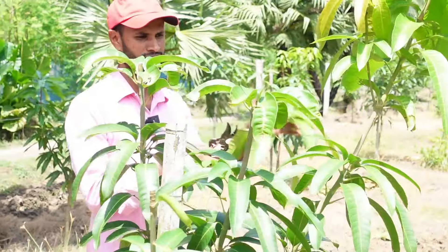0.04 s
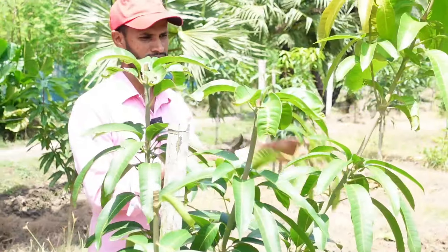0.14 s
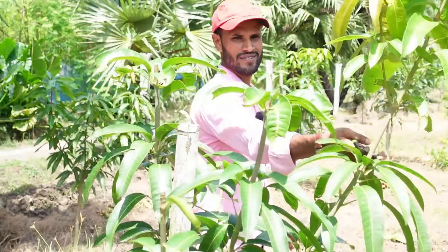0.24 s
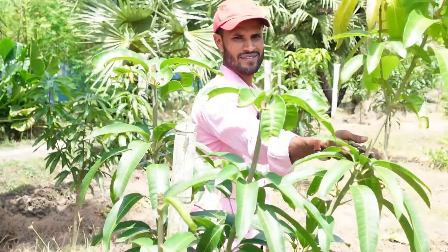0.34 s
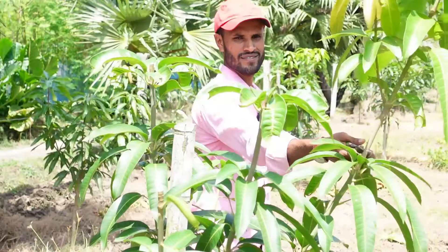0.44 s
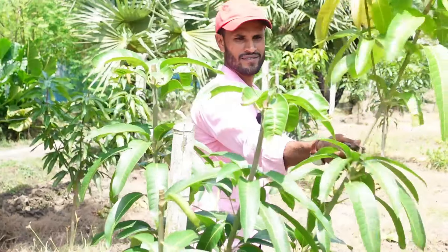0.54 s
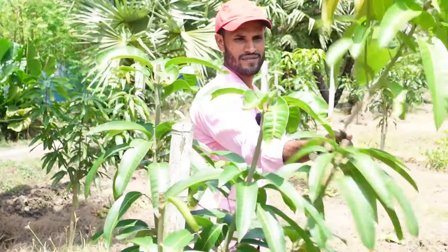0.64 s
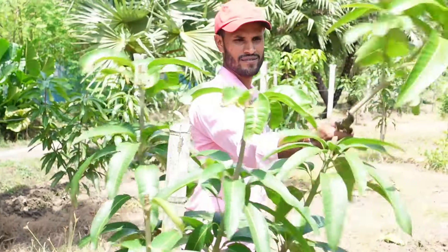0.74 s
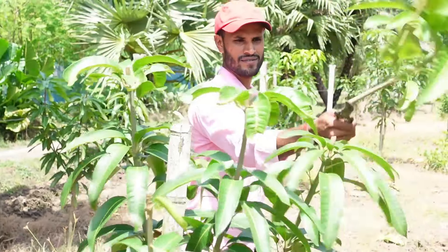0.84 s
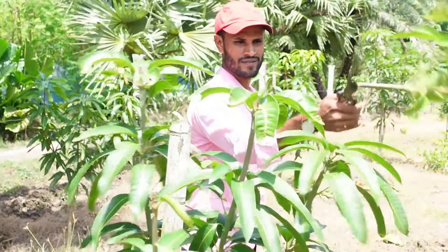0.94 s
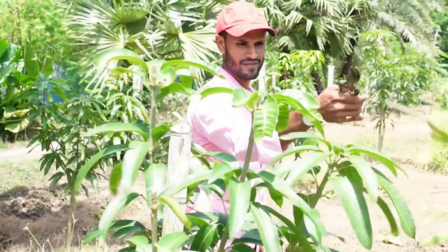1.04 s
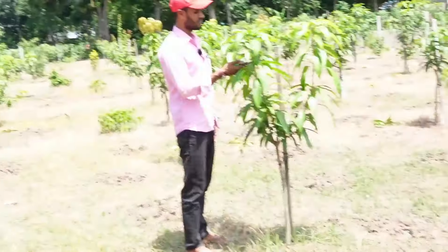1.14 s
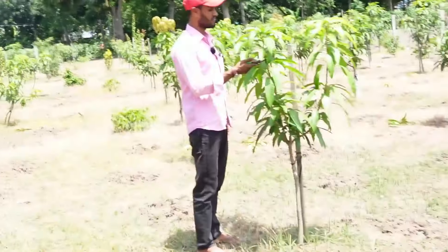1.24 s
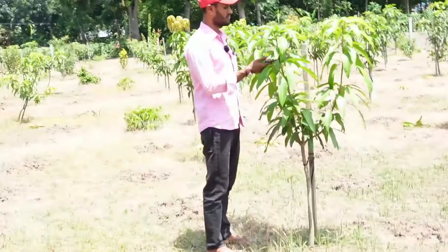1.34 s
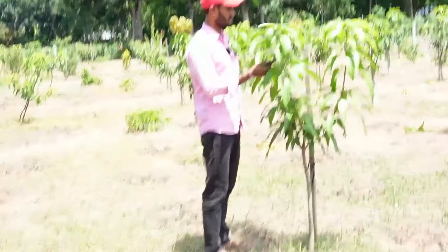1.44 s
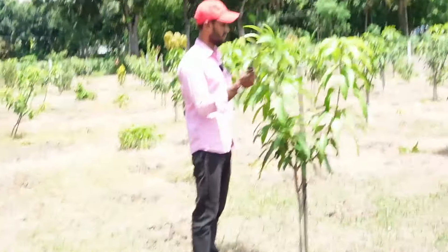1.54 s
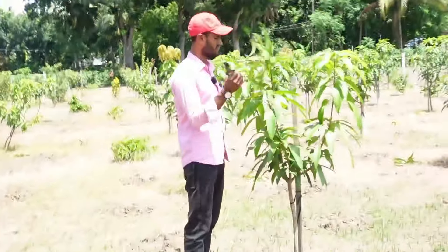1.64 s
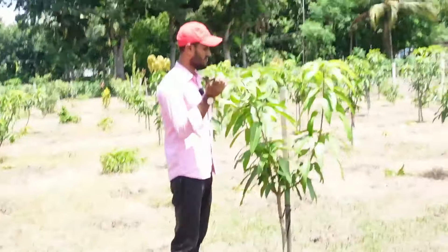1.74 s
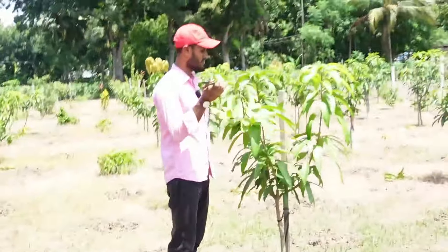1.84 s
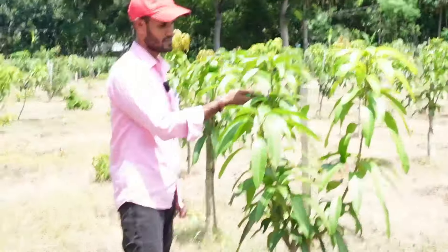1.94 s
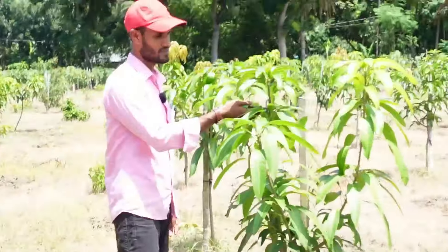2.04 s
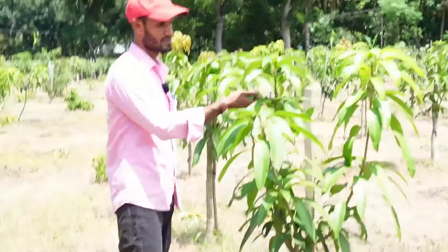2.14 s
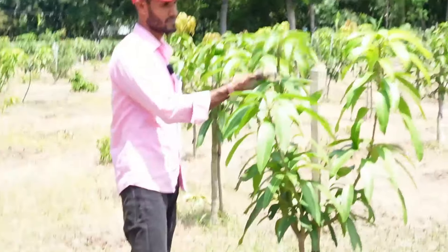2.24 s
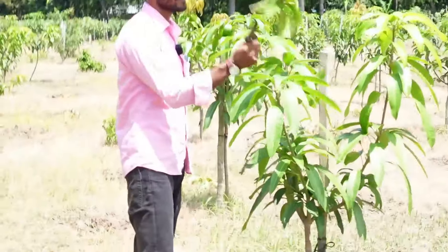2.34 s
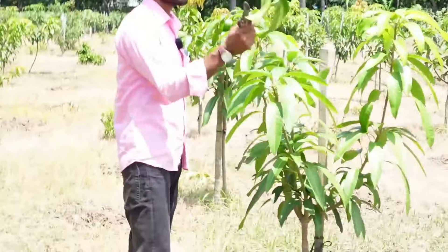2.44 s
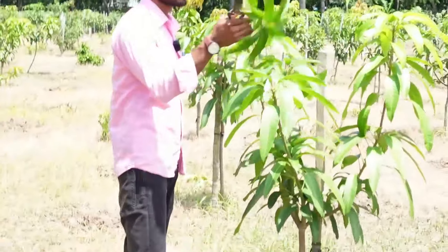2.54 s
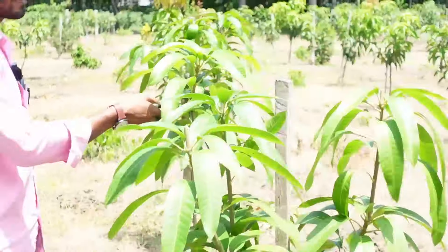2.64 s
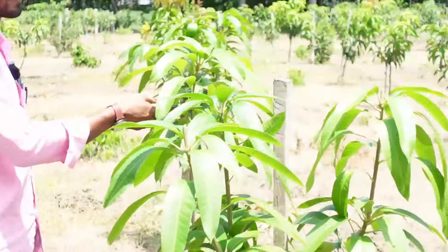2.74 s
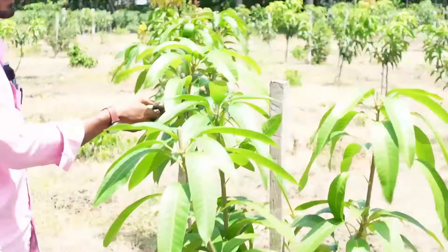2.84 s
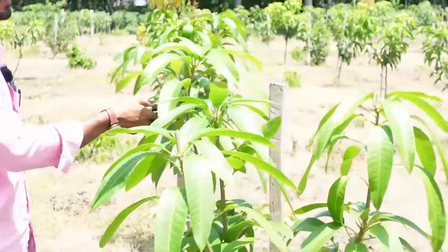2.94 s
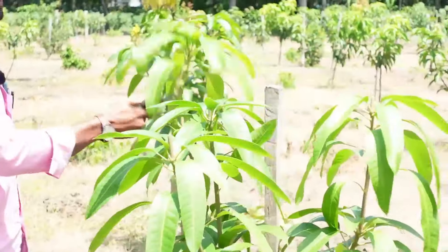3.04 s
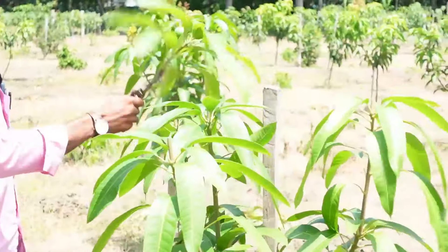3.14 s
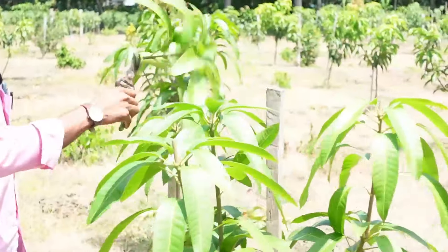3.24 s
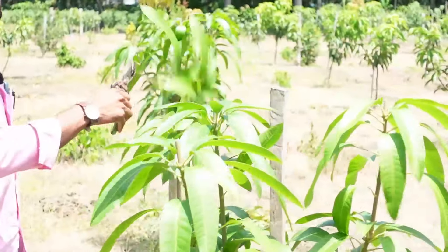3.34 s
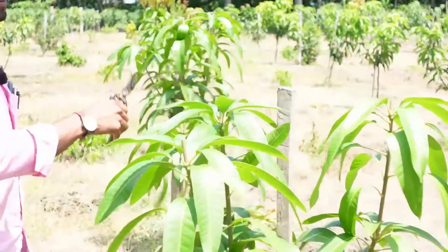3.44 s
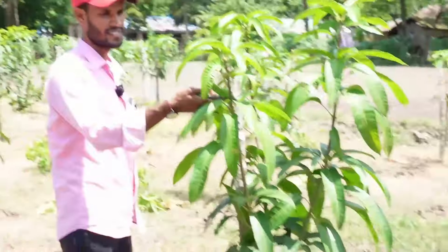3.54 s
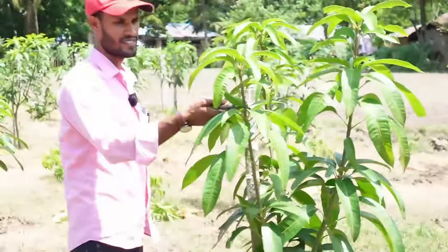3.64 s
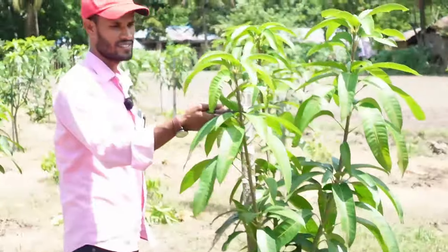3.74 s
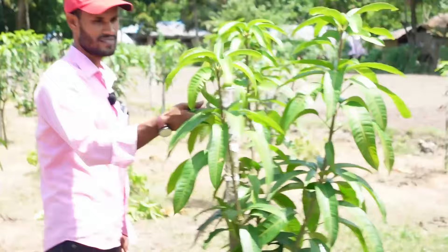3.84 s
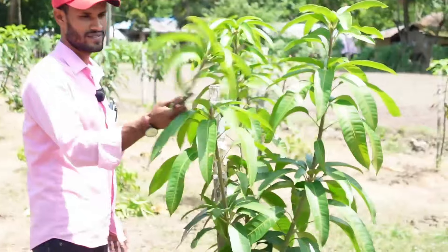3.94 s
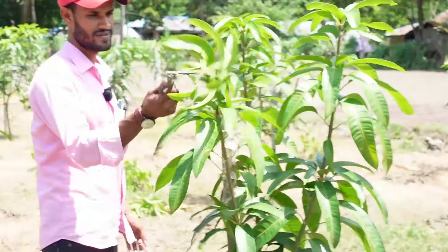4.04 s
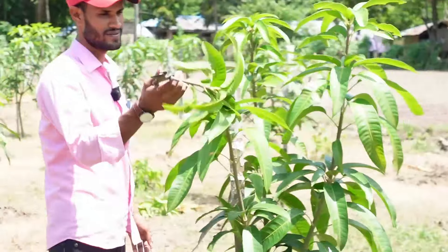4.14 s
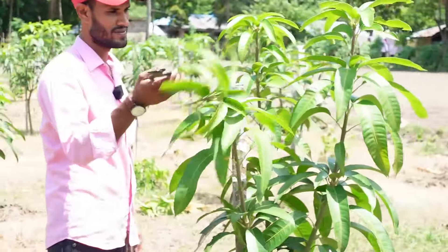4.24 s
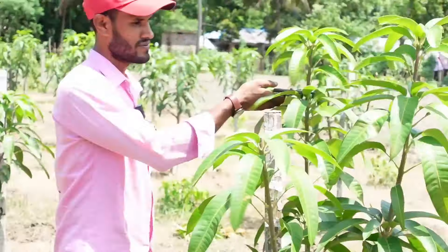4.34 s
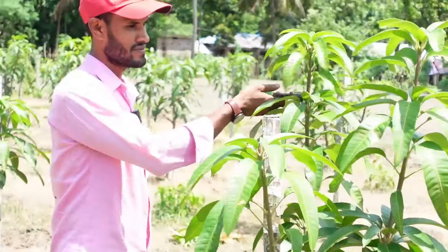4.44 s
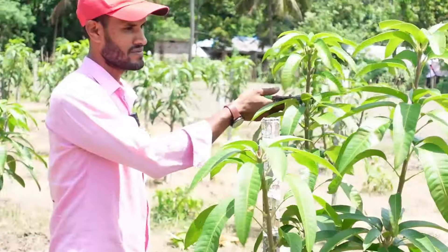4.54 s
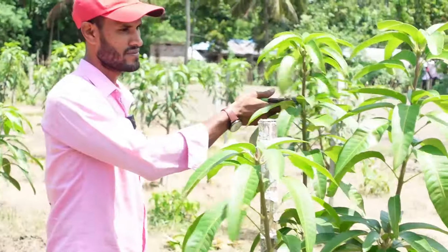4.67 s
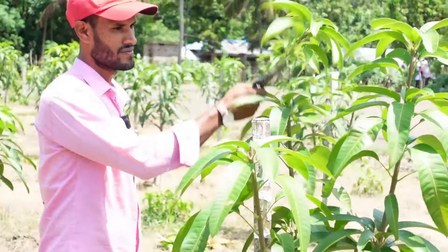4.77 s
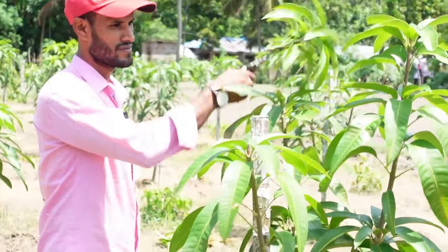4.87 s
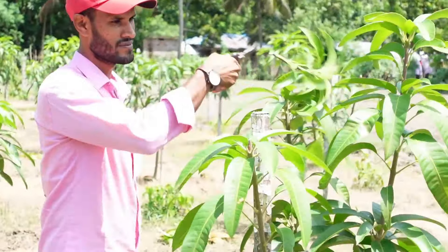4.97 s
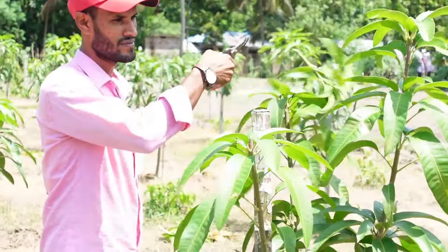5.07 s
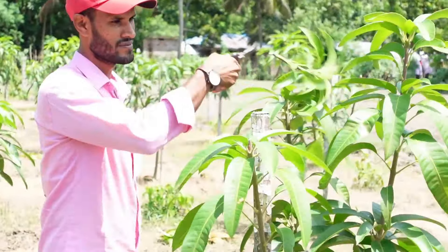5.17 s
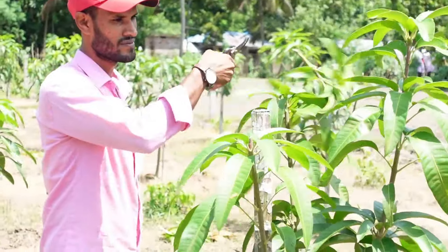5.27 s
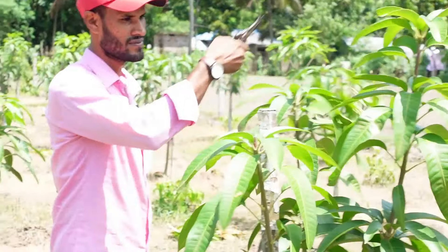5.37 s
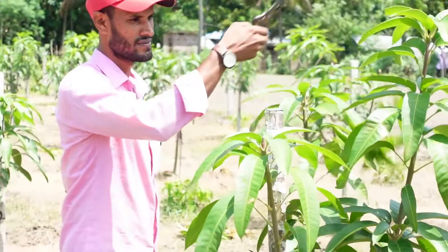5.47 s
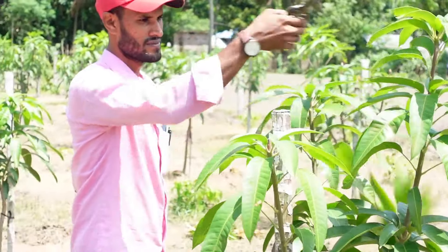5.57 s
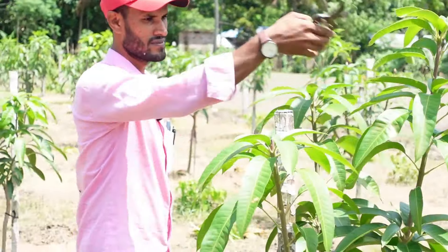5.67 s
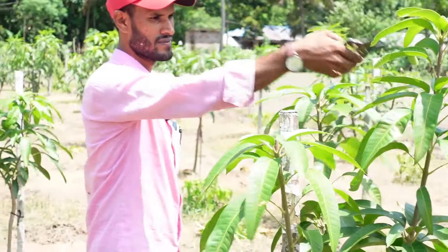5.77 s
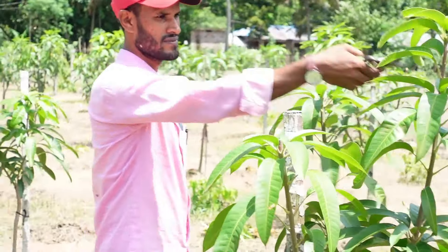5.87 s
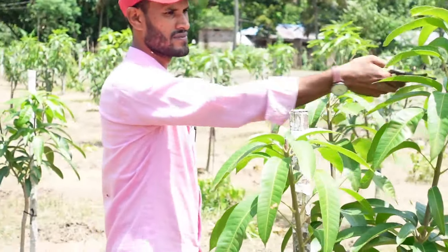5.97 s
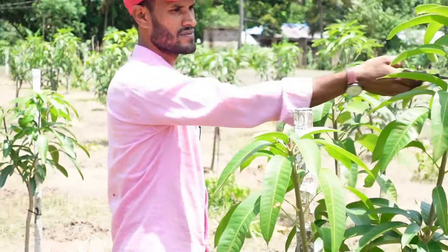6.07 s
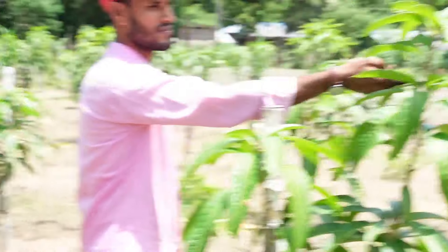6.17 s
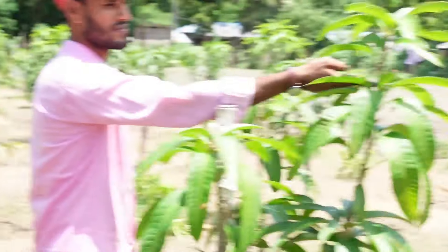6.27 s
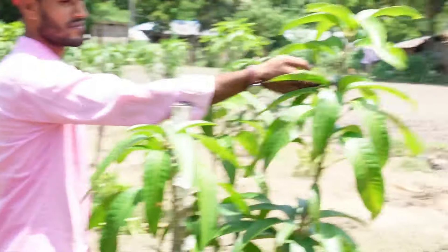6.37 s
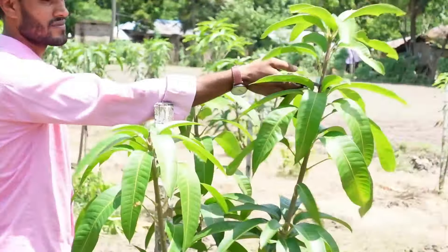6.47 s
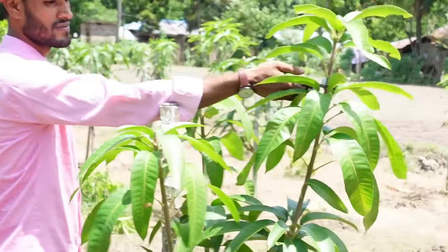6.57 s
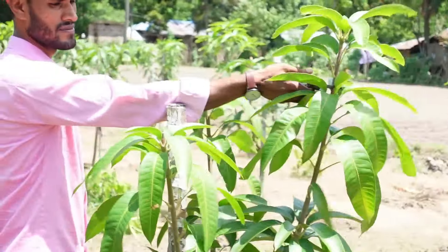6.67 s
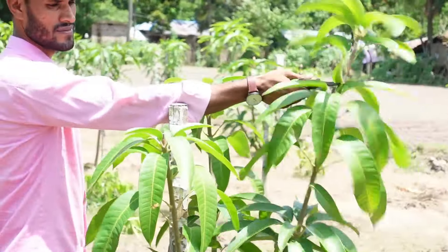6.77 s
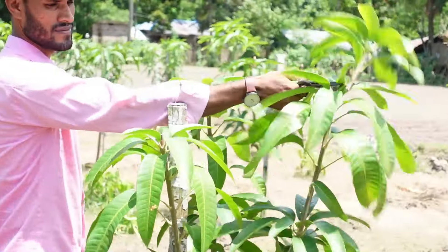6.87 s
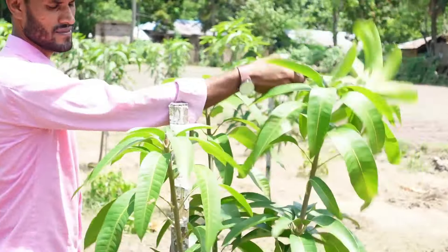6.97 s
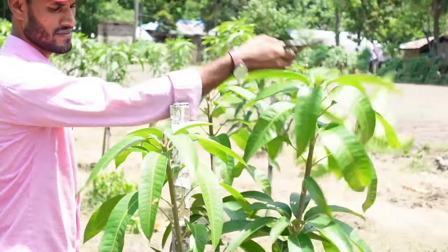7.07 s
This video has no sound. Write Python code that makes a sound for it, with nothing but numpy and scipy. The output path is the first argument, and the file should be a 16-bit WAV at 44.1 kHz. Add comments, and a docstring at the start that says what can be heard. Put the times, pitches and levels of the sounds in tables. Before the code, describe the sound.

Hand pruning shears snap shut seven times with sharp metallic snips, stiff leaves rustling between cuts in a quiet, breezy orchard.

```python
"""In an orchard, close to a lapel microphone, hand secateurs snip green shoots.
Each snip: fibres crackle as the blade bites, then damped modes ring for the slam and for the rebound.
One stem tears in a dense crunch. Leaves rustle in filtered noise and short rings, and they tick;
the spring squeaks in rough harmonics. Breeze, insect hiss and faint far tones lie under it."""
import sys
import numpy as np
from scipy import signal
from scipy.fft import rfft, irfft, next_fast_len
from scipy.io import wavfile
from scipy.ndimage import uniform_filter1d

SR = 44100
rng = np.random.default_rng(int(sys.argv[2]) if len(sys.argv) > 2 else 0)


def transcribe(signal):
    """Save signal, clipped to [-1, 1], as a 16-bit WAV file at the path in sys.argv[1]."""
    frames = np.atleast_2d(signal).T
    limited = np.clip(frames, -1, 1)
    pcm = np.round(limited * 32767).astype(np.int16)
    wavfile.write(sys.argv[1], SR, pcm)


N = 313418  # length in samples


def amp(db):
    """Turns dB into a linear gain."""
    return 10 ** (np.asarray(db, float) / 20)


def evened(x):
    """Brings a signal to rms 1."""
    return x / np.sqrt(np.mean(x ** 2) + 1e-20)


def noise(length):
    """White noise."""
    return rng.standard_normal(length)


def read(points, hz):
    """Reads a curve between its points, along log frequency."""
    f, value = np.transpose(points)
    return np.interp(np.log(hz + 1), np.log(f + 1), value)


def add(mix, s, sound):
    """Lays a sound into the mix at s seconds."""
    part = mix[max(round(s * SR), 0):][:len(sound)]
    part += sound[:len(part)]


def colour(x, points):
    """Filters by a spectrum, with rms 1."""
    size = next_fast_len(len(x))
    gain = amp(read(points, np.fft.rfftfreq(size, 1 / SR)))
    return evened(irfft(rfft(x, size) * gain, size)[:len(x)])


def wander(length, seconds):
    """Smooth chance of rms 1: noise averaged twice over the given time."""
    width = max(int(seconds * SR), 1)
    return evened(uniform_filter1d(uniform_filter1d(noise(length), width), width))


def crackle(length, per_s, spread_db):
    """Clicks of very unequal size, scattered at random."""
    draw = rng.random((length, 2))
    clicks = draw[:, 0] < per_s / SR
    size = amp(-spread_db * np.log(draw[:, 1] + 0.0024))
    return clicks * size * noise(length)


def ring(t, hz, t60):
    """A damped mode struck at t = 0; the contact lasts a fraction of a millisecond."""
    u = np.maximum(t, 0)
    contact = 1 - np.exp(-u / 0.00043)
    return np.sin(2 * np.pi * hz * u) * amp(-60 * u / t60) * contact


# Spectrum of the far hiss: f/Hz, relative level/dB per Hz
AIR_SPECTRUM = [(71, -25), (120, -0.5), (300, -2), (695, -5), (1500, -14), (2500, -16), (4740, -23),
                (5900, -28.5), (8300, -27.5), (9600, -19.5), (10300, -25.5), (11000, -34), (15800, -46)]
AIR_DB = -62.5


def far_hiss():
    """Insects and air far off: coloured noise, almost steady."""
    return amp(AIR_DB + 0.39 * wander(N, 0.04)) * colour(noise(N), AIR_SPECTRUM)


# Strength of the breeze, before its lumps: t/s, level/dB
BREEZE_LEVEL = [(0.0, -56.5), (0.14, -63), (3.15, -62.5), (4.3, -57.5), (5.66, -65.5), (6.35, -61.5),
                (6.8, -48), (6.95, -55.5), (7.11, -47)]
# Spectrum of the breeze: f/Hz, relative level/dB per Hz
GUST_SPECTRUM = [(15, -9), (30, 6), (60, 4.5), (100, 1.5), (160, -7.5), (300, -46.5)]


def breeze(t):
    """Wind buffets the microphone: deep noise with a lumpy level."""
    level_db = np.interp(t, *np.transpose(BREEZE_LEVEL)) + 1.5 * wander(N, 0.016)
    return amp(level_db) * colour(noise(N), GUST_SPECTRUM)


# Faint far tones, before wavering: t/s, length/s, start f/Hz, end f/Hz, level/dB
FAR_TONES = [(1.152, .3, 782, 777, -67), (1.553, 0.43, 606, 573, -64), (2.746, .12, 587, 590, -62),
             (3.102, 0.35, 746, 714, -58), (3.123, .78, 638.5, 568, -63), (4.905, 2.87, 352, 346.7, -70)]


def far_tone(s, length, from_hz, to_hz, db):
    """A gliding sine, unsteady in pitch and level."""
    size = round(length * SR)
    hz = np.linspace(from_hz, to_hz, size) * (1 + .03 * wander(size, 0.0042))
    turn = 2 * np.pi * np.cumsum(hz) / SR
    level = amp(db + 3 * wander(size, .008))
    return s, level * np.sin(turn) * signal.windows.tukey(size, .3)


def grains(low_hz, high_hz, count=14):
    """Leaf edges catch and let go: short rings of many pitches, each coming in its own clumps."""
    out = np.zeros(N)
    for hz in np.geomspace(low_hz, high_hz, count):
        t = np.arange(0, 12 / hz, 1 / SR)
        clumps = amp(3.5 * np.repeat(wander(N // 64 + 1, .0003), 64)[:N])  # one value per 64 samples
        catches = clumps * crackle(N, 500, 2.5)
        out += np.sqrt(hz) * signal.oaconvolve(catches, ring(t, hz, 11 / hz))[:N]
    return evened(out)


def patchy(x, patchy_db):
    """Separate leaves brush one after another, each in its own range of pitch."""
    z = signal.stft(x, nperseg=256)[2]
    patches = uniform_filter1d(noise(z.shape), size=9, axis=0)  # neighbouring pitches
    patches = uniform_filter1d(patches, size=6, axis=1)  # neighbouring moments
    return signal.istft(z * amp(patchy_db * evened(patches)), nperseg=256)[1][:N]


# Leaves brush hand and tool; levels before the flicker:
# t/s, length/s, dull level at the start/dB, dull level at the end/dB, bright level against dull/dB
BRUSHES = [(0.029, 0.074, -54, -57, -3.5), (.61, .04, -50.5, -50.5, -9.5), (0.694, 0.27, -54, -70, -6),
           (1.024, 0.13, -61, -70, -13), (1.44, 0.028, -57, -54.5, -13), (1.526, .08, -44, -57, -9),
           (1.686, 0.05, -53, -53, -6), (1.789, 0.12, -58.5, -49.5, -7.5), (2.23, .05, -57.5, -57, -19.5),
           (2.337, 0.07, -49.5, -58, -7.5), (2.424, 0.25, -58.5, -54.5, -3.5),
           (3.015, 0.044, -53.5, -52.5, -12.5), (3.1, .22, -65, -55.5, -11), (3.38, 0.15, -58.5, -53, -12),
           (3.875, 0.055, -59.5, -49.5, -10.5), (3.984, .06, -53.5, -56, -6.5),
           (4.104, 0.13, -50, -52, -6.5), (4.299, 0.044, -58.5, -56.5, -6.5),
           (4.811, 0.11, -56, -54.5, -7.5), (4.964, 0.48, -49.5, -52.5, -3), (5.576, 0.038, -63, -62.5, -3),
           (5.845, 0.032, -65.5, -60, -5.5), (6.03, 0.083, -53.5, -64, -6.5),
           (6.36, 0.064, -67, -63.5, -3.5), (6.815, 0.16, -47.5, -55, -9.5), (7.025, .1, -53, -58.5, -8)]
RISE_DB_PER_S, FALL_DB_PER_S = 498.5, 350
STIR_DB, STIR_TREBLE_DB = -69.5, -9  # the foliage never falls quite still


def brushing(t):
    """Gains of the dull and bright leaf noise: each brush rises, drifts and lets go; their powers add."""
    dull, bright = amp(STIR_DB) ** 2, amp(STIR_DB + STIR_TREBLE_DB) ** 2
    for s, length, start_db, end_db, treble_db in BRUSHES:
        drift_db = np.interp(t, [s, s + length], [start_db, end_db])
        rise_db = RISE_DB_PER_S * np.minimum(t - s, 0)
        fall_db = -FALL_DB_PER_S * np.maximum(t - s - length, 0)
        power = amp(drift_db + rise_db + fall_db) ** 2
        dull = dull + power
        bright = bright + power * amp(treble_db) ** 2
    return np.sqrt(dull), np.sqrt(bright)


# Spectra of soft and crisp leaf noise: f/Hz, relative level/dB per Hz
LEAF_DULL = [(250, -10), (600, -3.5), (1000, -3.5), (2000, -2), (4000, -6.5), (6000, -15.5), (12000, -38.5)]
LEAF_BRIGHT = [(3000, -10.5), (5000, 0.5), (7500, 1.5), (9500, -4.5), (11500, -13.5), (15500, -23)]
# A cut shoot is drawn smoothly through the foliage: start t/s, end t/s
SWISH = (4.6, 5.48)
# Tint of the leaves during the swish: f/Hz, relative level/dB
SWISH_TINT = [(500, -3), (1100, 1), (2500, -1.5), (5500, -4.5), (8000, 1), (12000, -4.5)]


def rustle(t):
    """Hiss and crackle of stiff leaves, flickering; the swish is more even and hollow in the middle."""
    swishing = (t > SWISH[0]) & (t < SWISH[1])
    uneven = np.where(swishing, .6, 1)
    flicker = amp(2.8 * uneven * wander(N, .007))
    dull = colour(patchy(noise(N), 4.8) + .75 * uneven * grains(500, 5000), LEAF_DULL)
    bright = colour(patchy(noise(N), 3.0) + .7 * uneven * grains(4100, 14000), LEAF_BRIGHT)
    dull_gain, bright_gain = brushing(t)
    leaves = dull + bright_gain / dull_gain * bright
    leaves = np.where(swishing, colour(leaves, SWISH_TINT), leaves)
    return flicker * dull_gain * leaves


# Leaves and twigs tick: t/s, relative level/dB, f/Hz, ring t60/s (the ring lasts at least 2 ms)
TICKS = [(0.075, -25, 800, 0.0043), (0.098, -29.5, 2590, 0.04), (0.603, -11.5, 1090, 0.0043),
         (0.607, -24.5, 1410, 0.012), (0.982, -41.5, 600, 0.023), (1.02, -33, 2780, 0.0038),
         (1.111, -34, 775, 0.017), (1.379, -36, 1250, 0.034), (1.538, -33.5, 1500, 0.008),
         (1.442, -33, 1270, 0.035), (1.894, -22, 910, 0.0068), (2.234, -39, 1230, 0.02),
         (2.426, -31.5, 708, 0.016), (2.533, -34.5, 644, 0.033), (2.593, -28.5, 2820, 0.0051),
         (2.614, -29, 780, 0.015), (3.014, -34, 2750, 0.026), (3.234, -41, 2080, 0.049),
         (3.285, -32, 721, 0.0051), (3.364, -32, 720, 0.011), (3.549, -36.5, 610, 0.014),
         (3.873, -29, 1864, 0.0036), (4.016, -29, 1850, 0.0055), (4.125, -26.5, 790, 0.0075),
         (4.173, -26, 3800, 0.0055), (4.19, -28, 690, 0.02), (4.217, -23, 4280, 0.0039),
         (4.979, -32, 868, 0.015), (5.493, -35.5, 1833, 0.015), (5.993, -20, 4710, 0.0097),
         (6, -13, 2170, 0.0019), (6.023, -23, 1330, 0.0073), (6.066, -35, 1760, 0.01),
         (6.198, -37.5, 650, 0.046), (6.875, -32, 744, 0.012), (6.924, -36, 2730, 0.0049),
         (7.025, -24.5, 2280, 0.007), (7.034, -26, 5000, 0.0079)]
PUFF_TREBLE_DB = -14


def tick(s, db, hz, t60):
    """A click, a short damped ring and a puff of noise that builds up just before."""
    lead_s = .01
    t = np.arange(-lead_s, .09, 1 / SR)
    fade = np.where(t < 0, .5 * amp(1540 * t), amp(-60 * t / (0.0036 + t60)))
    puff = amp(PUFF_TREBLE_DB) * colour(noise(len(t)), LEAF_BRIGHT)
    puff += .5 * colour(noise(len(t)), LEAF_DULL)
    body = .7 * ring(t, hz, max(t60, .002))
    click = .8 * ring(t, 2500, .0015)
    return s - lead_s, amp(db) * (body + click + .35 * fade * puff)


# Spring squeaks: t/s, relative level/dB, mean f/Hz, length/s
SQUEAKS = [(0.035, -41, 5760, 0.019), (0.059, -40, 6650, 0.015), (0.975, -62, 2140, 0.035),
           (1.673, -58, 1940, 0.04), (1.705, -49.5, 2090, 0.032), (3.251, -57.5, 2430, 0.028),
           (3.277, -56, 2160, 0.028), (4.109, -44, 6130, 0.027), (4.402, -62, 2215, 0.034),
           (4.953, -40, 6210, 0.01), (5.154, -48, 6050, 0.011), (6.472, -64.5, 2300, 0.036)]
SPRING_HZ = 6850  # overtones near this pitch ring strongest


def squeak(s, db, hz, length):
    """Stick and slip in the spring: a rough short whistle whose overtones ring the steel."""
    t = np.arange(0, length, 1 / SR)
    turn = 2 * np.pi * np.cumsum(hz * (1 + 0.035 * wander(len(t), 0.0011))) / SR
    tone = np.zeros(len(t))
    for k in range(1, int(15000 // hz) + 1):
        overtone_db = -18 * np.log2(k * hz / SPRING_HZ) ** 2 + 2.2 * wander(len(t), 0.0048)
        tone += amp(overtone_db) * np.sin(k * turn)
    return s, amp(db) * tone * signal.windows.tukey(len(t), .6)


# Spectrum of parting stem fibres: f/Hz, relative level/dB per Hz
STEM_SPECTRUM = [(120, -39), (200, -10), (1700, -5.5), (3100, -11.5), (3590, -7.5), (6000, -14),
                 (8640, -14), (15800, -35.5)]
# A stem tears slowly in the jaws: t/s, length/s, relative level/dB
TEARS = [(5.984, 0.063, -31.5)]
TEAR_FADE_DB, TEAR_LOW_HZ, TEAR_HIGH_HZ = -15, 1000, 6540


def tear(s, length, db):
    """Fibres part one after another: a dense crunch in the middle range, fading as it goes."""
    t = np.arange(0, length, 1 / SR)
    crunch = colour(crackle(len(t), 4000, 1.1), STEM_SPECTRUM)
    b, a = signal.butter(2, [TEAR_LOW_HZ, TEAR_HIGH_HZ], "band", fs=SR)
    crunch = signal.lfilter(b, a, crunch)
    return s, amp(db + TEAR_FADE_DB * t / length) * crunch * signal.windows.tukey(len(t), .3)


# The stem snaps just before the slam: t/s, relative level/dB, f/Hz
SNAPS = [(1.4771, -1, 1298), (1.4797, -9, 1120), (2.292, -11, 868), (3.0645, -7, 1280),
         (3.9384, -10.5, 1253), (4.763, -12, 895), (6.8032, -10.5, 1850)]


def snap(s, db, hz):
    """The stem gives way: a dull pop of about one cycle."""
    return s, 1.9 * amp(db) * ring(np.arange(0, .02, 1 / SR), hz, 3.4 / hz)


# Steel modes of the blades, before each blow's random spread: f/Hz, relative level/dB, t60/s
STEEL_MODES = [(4542, -11, 0.025), (4920, -11.5, 0.022), (6000, -10.5, 0.015), (6550, -14, 0.031),
               (7170, -8, .02), (7780, -13.5, 0.034), (8030, -12, .02), (8680, -4.5, 0.017),
               (9500, -14.5, 0.016), (12700, -23.5, 0.024)]
# Spectrum of the scrape and rattle: f/Hz, relative level/dB per Hz
CRASH_SPECTRUM = [(120, -38.5), (200, -11), (1080, -13.5), (1360, -18.5), (2320, -5), (3340, -15),
                  (4900, -12.5), (6690, -19.5), (8800, -15), (11400, -18), (15800, -31)]


def blow(u, handle_hz, steel_db):
    """The handles strike at u = 0: a cluster of handle modes, the blade steel and a short clack."""
    handles = ring(u, handle_hz, 0.026)
    handles += 0.65 * ring(u, 1.11 * handle_hz, 0.026)
    handles += 0.3 * ring(u, .78 * handle_hz, 0.032)
    handles += 0.12 * ring(u, 1020, 0.031)
    handles += .012 * ring(u, 1.01 * handle_hz, .12)  # a faint longer ring stays behind
    steel = np.zeros(len(u))
    for hz, db, t60 in STEEL_MODES:
        steel += amp(db + 4.2 * noise(None)) * ring(u, hz * rng.uniform(1.0, 1.03), t60)
    return 0.72 * handles + amp(steel_db) * steel + .5 * ring(u, 3600, 0.0021)


# Snips, and the tool's faint catch at 2.453 s; levels after the slam's are weights against it:
# slam t/s, slam level/dB, handle f/Hz, steel level/dB, knock level/dB, thud level/dB,
# rebound delay/ms, rebound level/dB, bite length/ms, bite level/dB
SNIPS = [(.661, -7, 2366, -2, -22.5, -22, 3.94, 0, 12.3, -26),
         (1.486, -5, 2292, -0.5, -19.5, -30, 5.4, -12.5, 17.2, -22.5),
         (2.297, -6.5, 2348, -6.5, -33, -31, 5.04, 1.5, 10, -19.5),
         (2.453, -25.5, 2354, -2, -43, -35, 2.5, -23, 4.9, -31),
         (3.072, -6.5, 2300, -5, -23.5, -29, 4.04, -0.5, 12, -22.5),
         (3.945, -3.5, 2329, -4, -22.5, -34, 4, -4, 13, -30),
         (4.7687, -8, 2234, -2, -12, -25.5, 4.07, 0.5, 7.4, -21.5),
         (6.808, -17.5, 2280, 6, -18, -16.5, 4.46, -5.5, 11.8, -9.5)]


def snip(s, db, handle_hz, steel_db, knock_db, thud_db, delay_ms, rebound_db, bite_ms, bite_db):
    """Fibres crackle in the bite, the blades scrape shut, and slam and rebound excite the tool's modes."""
    lead_s = .04
    t = np.arange(-lead_s, .16, 1 / SR)
    out = blow(t, handle_hz, steel_db)
    out += amp(rebound_db) * blow(t - delay_ms / 1000, handle_hz, steel_db)
    # the blades scrape as they close, then rattle, longer after a strong rebound
    scrape = amp(2800 * t)
    rattle = amp(-60 * t / (0.038 + 0.019 * amp(rebound_db))) + 0.039 * amp(-60 * t / 0.18)
    out += 0.19 * np.where(t < 0, scrape, rattle) * colour(noise(len(t)), CRASH_SPECTRUM)
    out += amp(knock_db) * ring(t, 250, 0.029)
    out += amp(thud_db) * ring(t + 0.0068, 71, 0.11)  # the thud leads the slam
    start = t + bite_ms / 1000
    bite = np.where(start < 0, 0.19 * amp(670 * start), amp(-1500 * np.maximum(t, 0)))
    # the crackle reaches full strength about a millisecond into the bite
    bite *= np.clip(0.89 + start / 0.0086, .4, 1)
    out += amp(bite_db) * bite * colour(crackle(len(t), 8000, 0.73), STEM_SPECTRUM)
    return s - lead_s, amp(db) * out


# Side level against the middle: f/Hz, level/dB
SIDE_LEVEL = [(30, -28.5), (1000, -46.5), (8000, -38), (13000, -15.5)]


def scene():
    """All sources add up nearly mono; a faint phase-randomised copy gives slight width."""
    t = np.arange(N) / SR
    mid = far_hiss() + breeze(t) + rustle(t)
    sources = ((far_tone, FAR_TONES), (tick, TICKS), (squeak, SQUEAKS), (tear, TEARS),
               (snap, SNAPS), (snip, SNIPS))
    for make, table in sources:
        for row in table:
            add(mid, *make(*row))
    hz = np.fft.rfftfreq(256, 1 / SR)
    random_phase = np.exp(2j * np.pi * rng.random(len(hz)))
    side_filter = irfft(amp(read(SIDE_LEVEL, hz)) * random_phase)
    # with the padding, the copy straddles the direct sound
    side = signal.oaconvolve(mid, np.r_[side_filter, np.zeros(128)], "same")
    return np.array([mid + side, mid - side])


EDGE_HZ = 15850


def record(dry):
    """The band limit: a steep low-pass that keeps the phase linear."""
    low_pass = signal.firwin(511, EDGE_HZ, window=("kaiser", 9), fs=SR)
    return signal.oaconvolve(dry, low_pass[None], "same")


dry = scene()
out = record(dry)
transcribe(out)
```